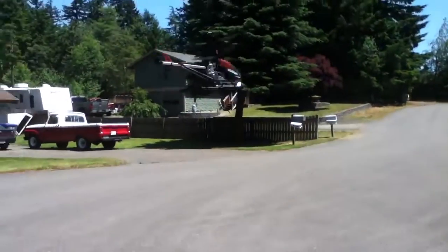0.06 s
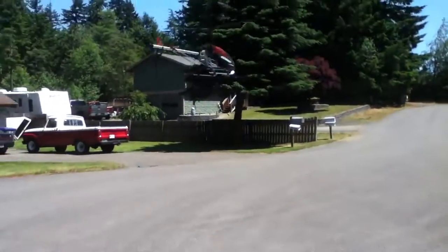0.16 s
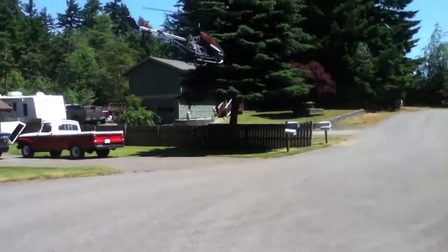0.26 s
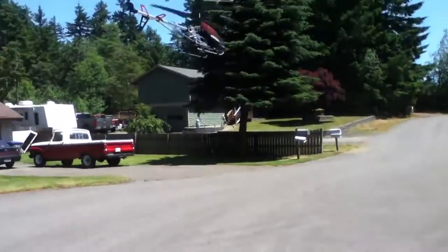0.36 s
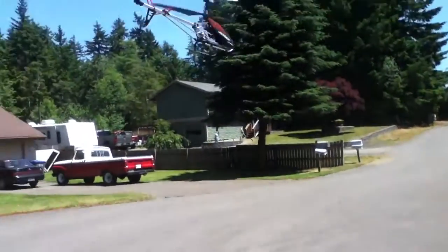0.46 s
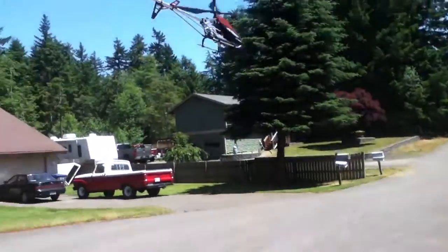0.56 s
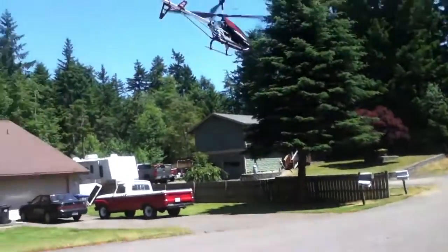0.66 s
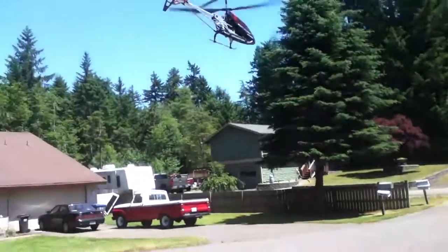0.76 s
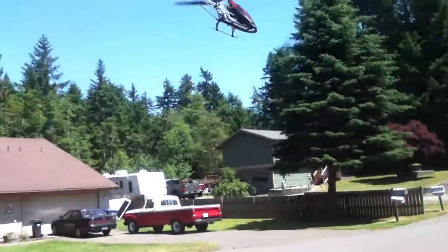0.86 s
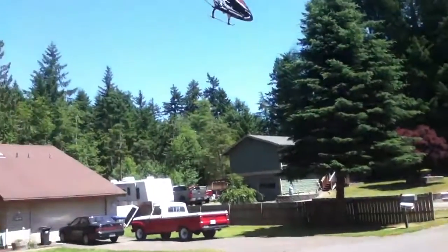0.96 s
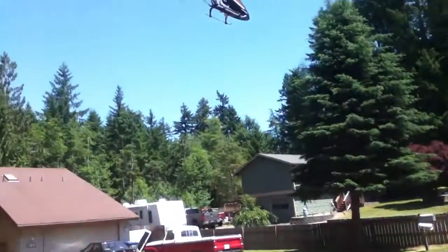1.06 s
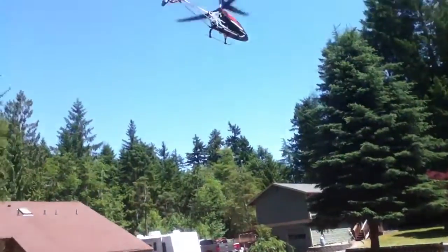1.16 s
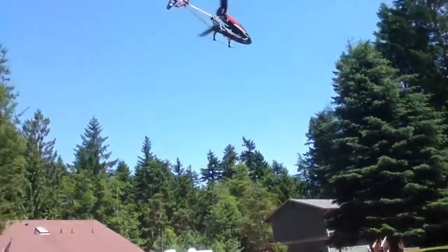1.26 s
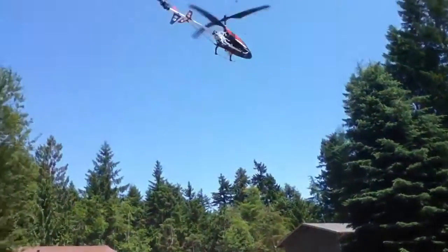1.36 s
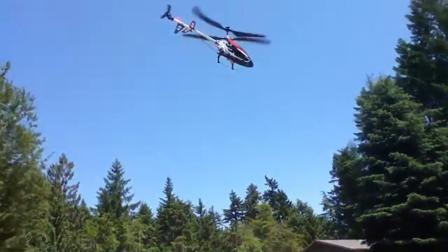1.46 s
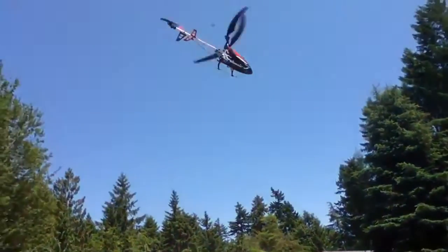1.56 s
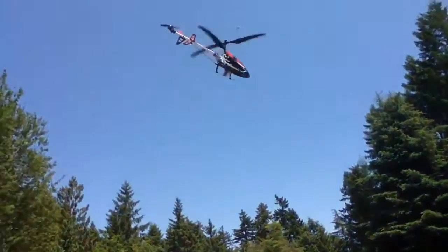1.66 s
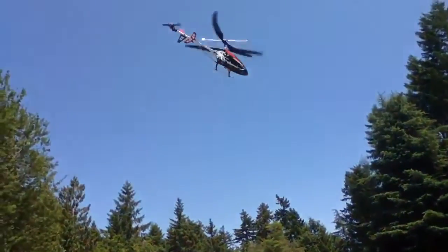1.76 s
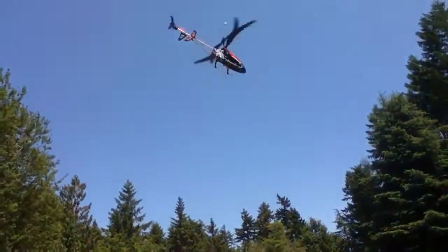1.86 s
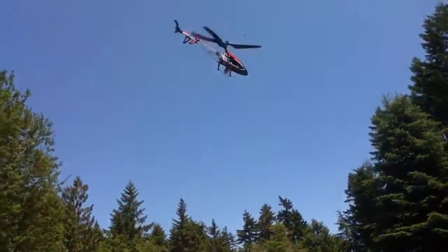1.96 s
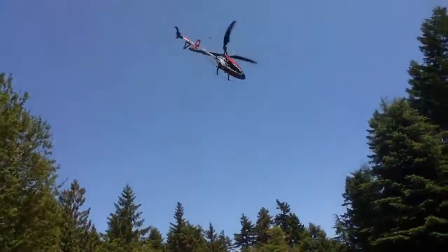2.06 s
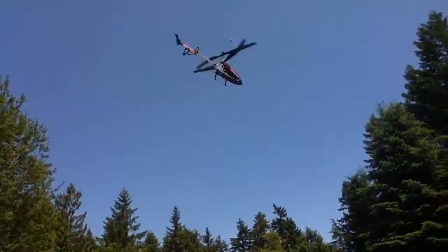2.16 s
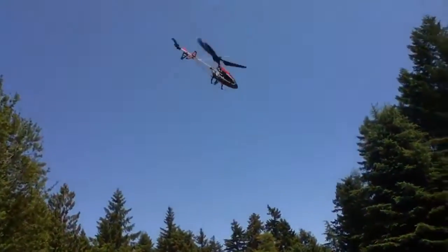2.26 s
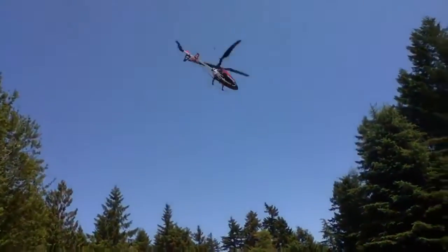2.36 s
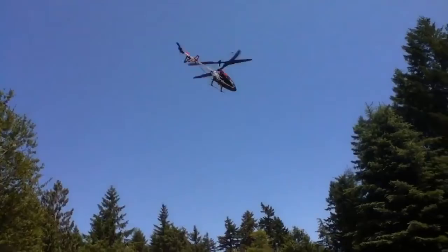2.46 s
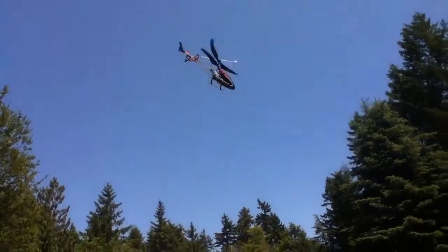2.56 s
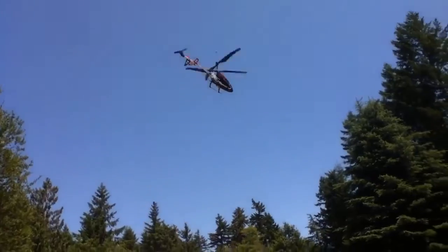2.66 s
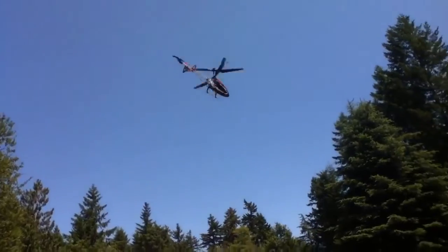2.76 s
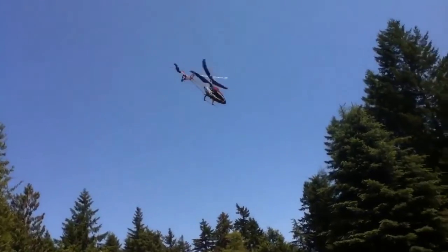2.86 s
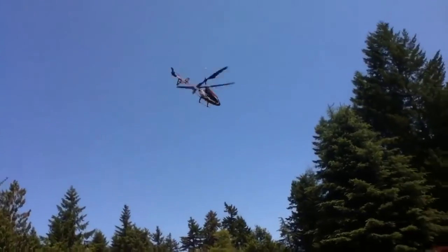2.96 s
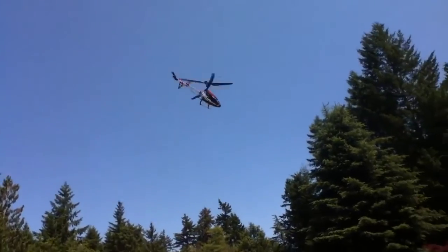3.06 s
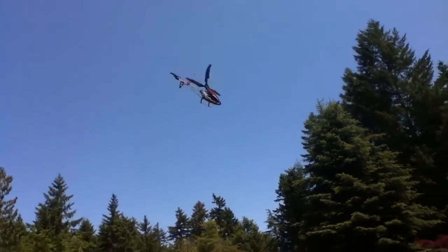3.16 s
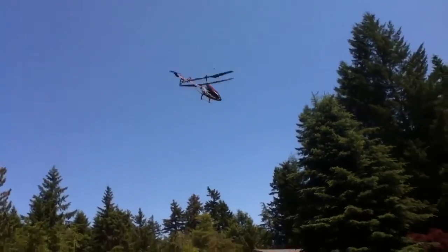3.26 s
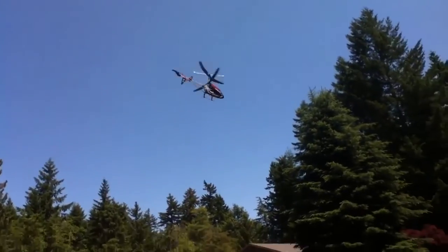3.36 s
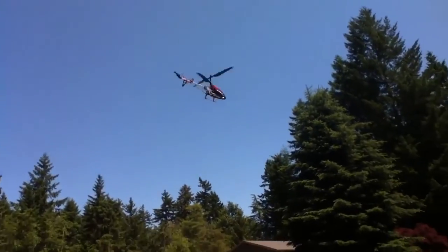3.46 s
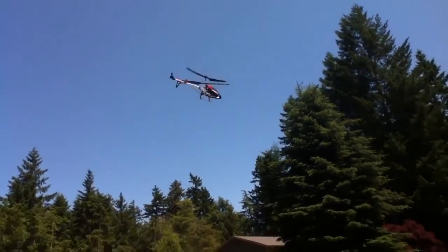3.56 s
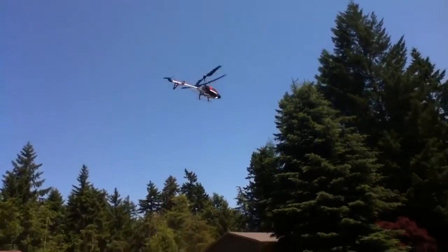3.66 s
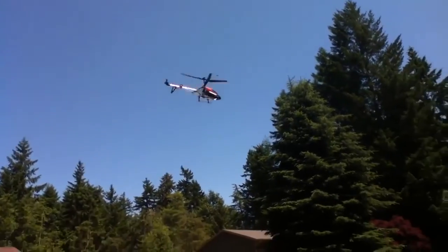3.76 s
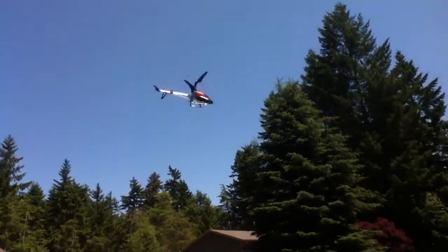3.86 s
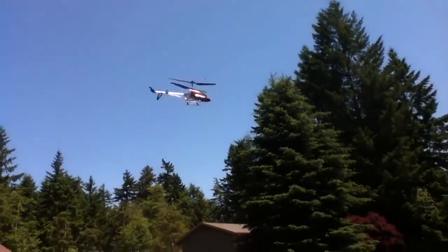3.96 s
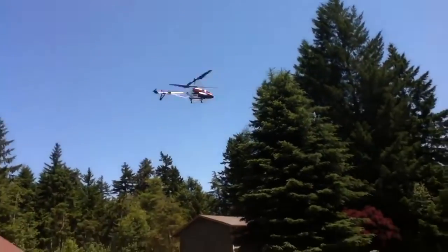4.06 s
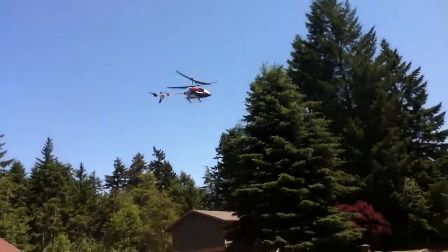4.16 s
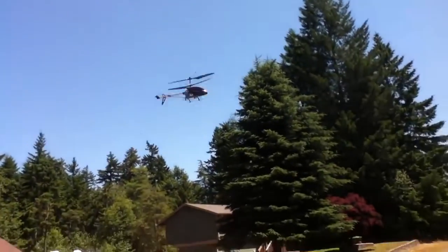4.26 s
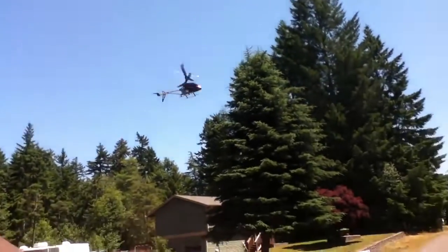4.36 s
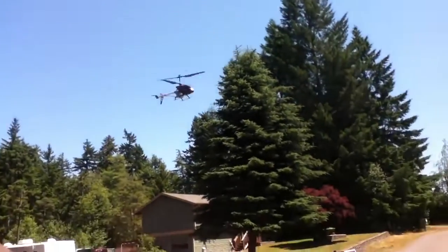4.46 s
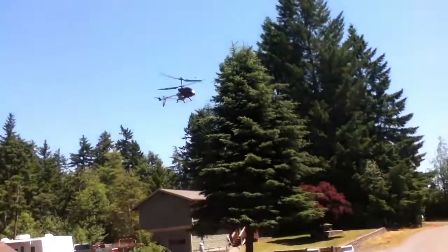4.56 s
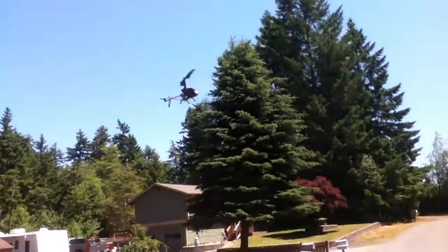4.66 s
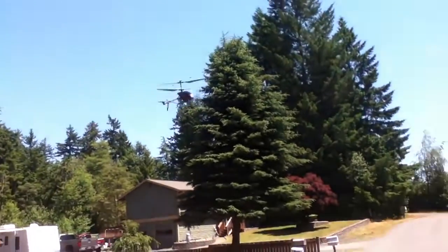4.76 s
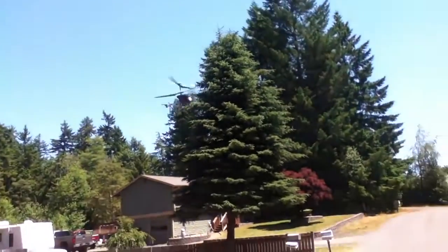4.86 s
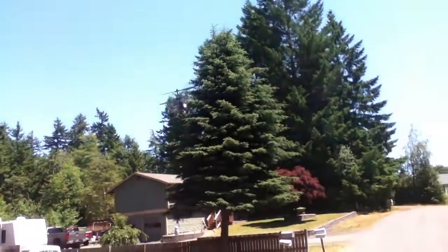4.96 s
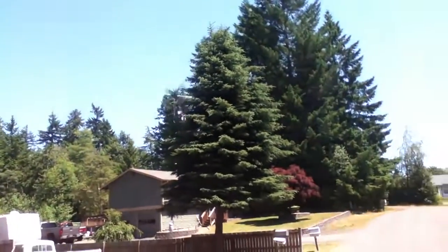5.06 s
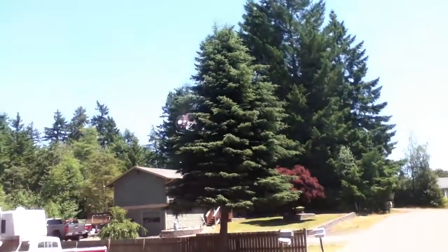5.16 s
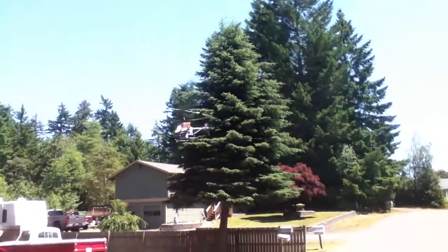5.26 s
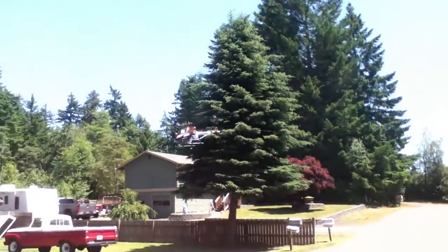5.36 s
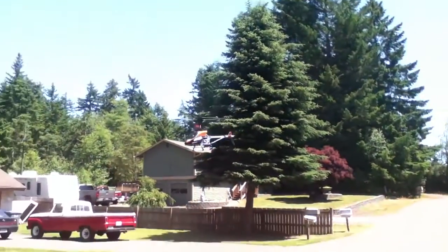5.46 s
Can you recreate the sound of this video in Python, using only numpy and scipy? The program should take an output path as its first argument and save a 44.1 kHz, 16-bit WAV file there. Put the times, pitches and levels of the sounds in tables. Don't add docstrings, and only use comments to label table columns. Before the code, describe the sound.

Thin, raspy geared motor whine with rapid rotor flutter and airy hiss, fading with distance, with light wind and a few taps on the microphone.

```python
import sys
import numpy as np
from scipy import signal
from scipy.fft import rfft, irfft, next_fast_len
from scipy.io import wavfile
from scipy.ndimage import uniform_filter1d

SR = 44100
rng = np.random.default_rng(int(sys.argv[2]) if len(sys.argv) > 2 else 0)


def transcribe(u):
    v = np.clip(np.atleast_2d(u).T, -1, 1)
    q = np.round(v * 32767).astype(np.int16)
    wavfile.write(sys.argv[1], SR, q)


def boost_factor(decibels):
    exponent = np.asarray(decibels, float) / 20
    return 10 ** exponent


N = 243873

# time_s, shaft_hz
UPPER_SPEED = [(0, 314.8), (.375, 308.4), (.5, 311.2), (.9, 314.5), (1.18, 312.5), (1.44, 292.3),
               (2.1, 292.7), (2.625, 285.6), (3.5, 294.4), (4.08, 310.7), (4.36, 315.6), (4.42, 310.4),
               (4.68, 292), (4.93, 291.2), (5.1, 309.4), (5.42, 311.3), (5.47, 284), (5.53, 286.3)]
GEAR_RATIO = 16
BANK_S, BANK_WIDTH_S = 4.11, 0.4


def evened(x):
    return x / np.sqrt(np.mean(x ** 2) + 1e-20)


def curves(rows):
    s, *columns = np.transpose(rows)
    return [np.interp(np.arange(N) / SR, s, c) for c in columns]


def spell(s, width):
    return np.exp(-((np.arange(N) / SR - s) / width) ** 4)


def drift(hz):
    size = next_fast_len(N // 16 + 2)
    f = np.fft.fftfreq(size, 16 / SR)
    phases = np.exp(2j * np.pi * rng.random(size))
    slow = np.fft.ifft(phases / (1 + (f / hz) ** 2))
    slow = slow / np.sqrt(np.mean(abs(slow) ** 2))
    return np.interp(np.arange(N) / 16, np.arange(size), slow)


def noise(points):
    size = next_fast_len(N)
    hz, db = np.transpose(points)
    log_hz = np.log(np.fft.rfftfreq(size, 1 / SR) + 1)
    shape_db = np.interp(log_hz, np.log(hz), db, left=-90, right=-90)
    spectrum = rfft(rng.standard_normal(size)) * boost_factor(shape_db)
    return evened(irfft(spectrum, size)[:N])


def tone(hz, rough, blur_hz):
    rough = np.clip(rough, 0, 1)
    body = np.sqrt(1 - rough) + np.sqrt(rough) * drift(blur_hz)
    return np.sqrt(2) * (body * np.exp(2j * np.pi * np.cumsum(hz) / SR)).real


def chop(turn, depth, lag=0.):
    swing = np.exp(depth * np.cos(turn - lag))
    return swing / np.sqrt(1 + depth ** 2 + depth ** 4 / 4)


def flight():
    # time_s, level_db
    distance = [(0, -1.5), (.45, -.5), (.85, 0.5), (1.4, -1.5), (2.66, -5.5), (3.4, -7), (3.97, -7),
                (4.28, -6.5), (4.56, -9), (5.17, -9), (5.53, -7)]
    # time_s, upper_wheel_db, belly_db
    upper_view = [(0, -2, -5), (.34, -0.5, -2), (.67, 2, 0.5), (.84, 3, -1), (1.0, -0.5, -1.5),
                  (1.2, 2.5, 0.5), (1.45, -1.5, -2), (1.85, -1.5, -1), (2.45, -2, 0), (2.8, 1, -6.5),
                  (3.15, -2, -2), (3.85, -1, 2.5), (4.02, 1.5, -3.5), (4.36, 1.5, -3.5), (4.53, -3.5, -6.5),
                  (4.8, 1, -7.5), (5.05, -5, -12), (5.53, -3, -18)]
    # time_s, lower_wheel_db
    lower_view = [(0, -1), (.17, -9), (.45, 2), (.85, -6), (1.2, -4.5), (1.36, 0), (1.85, 4), (2.7, 4),
                  (3.0, 1), (3.7, 2.5), (4.38, 3.5), (4.55, -4), (4.85, -3.5), (5.11, -13), (5.18, 7),
                  (5.42, 4), (5.48, 1), (5.53, -12)]
    cruise_hz = 300
    up, belly = curves(upper_view)
    climb = np.maximum(curves(UPPER_SPEED)[0] - cruise_hz, -12)
    return curves(distance)[0], up, curves(lower_view)[0], belly, climb


def gears(upper, lower, turn):
    # time_s, upper_percent, lower_percent
    tilt = [(0, .6, .6), (.5, .9, 1.2), (1.0, .5, 1.3), (1.4, .8, 1.4), (1.7, .6, 2.4), (2.3, .6, 1.9),
            (2.5, .5, .3), (2.9, .5, .3), (3.1, .7, 1.5), (3.5, .8, 1.2), (3.7, .8, .4), (4.08, .7, 3.8),
            (4.38, .6, 2.8), (4.43, 1.4, .6), (5.0, 1.5, .6), (5.15, .7, .7), (5.4, .6, .9), (5.47, 2.2, 3)]
    sweep_up, sweep_low = np.divide(curves(tilt), 100)
    high = upper * (1 - sweep_up * np.sin(turn - 1.9) + .002 * drift(30).real)
    low = lower * (1 - sweep_low * np.sin(turn) + .002 * drift(30).real)
    swing_up, swing_low = 32 * sweep_up, 700 * sweep_low ** 2
    far, up, down, belly, climb = flight()

    flare_s, flare_rise_s, flare_db = 5.47, 0.024, 14
    flare = np.clip((np.arange(N) / SR - flare_s) / flare_rise_s, 0, 1)
    broadside_s, broadside_width_s = 4.3, 0.61
    side = spell(broadside_s, broadside_width_s)

    high9 = boost_factor(-35 + 1.56 * far + 0.17 * up + 0.11 * climb + flare_db * flare)
    high18 = boost_factor(-22.5 + 1.11 * far + up + 0.019 * climb - 3.44 * flare)
    high27 = boost_factor(-34.5 + 0.91 * far + 0.45 * up + 0.2 * climb)
    both36 = boost_factor(-25.5 + 1.31 * far + belly)
    low9 = boost_factor(-34 + 0.96 * far + down)
    low18 = boost_factor(-28.5 + 0.79 * far + .1 * down + 0.4 * belly - 0.095 * climb + 6 * flare + 1.2 * side)
    low27 = boost_factor(-40 + 1.41 * far - .1 * down + 0.13 * climb + 7.4 * side)

    out = high9 * tone(9 * high, .8, 90) * chop(turn, swing_up, 1.9)
    out += high18 * tone(18 * high, .45 + .25 * side, 180) * chop(turn, swing_up, 1.9)
    out += high27 * tone(27 * high, 1.0, 180) * chop(turn, 0.28, 2.8)
    out += boost_factor(0.5) * both36 * tone(36 * high, 1, 420) * chop(turn, .3, 2.1)
    out += boost_factor(-6.0) * high27 * tone(45 * high, 0.82, 280)
    out += low9 * tone(9 * low, .1, 40) * chop(turn, swing_low, .3)
    out += low18 * tone(18 * low, .7 + .2 * side, 140) * chop(turn, .4 * swing_low, .3)
    out += low27 * tone(27 * low, 0.58, 150) * chop(turn, 0.36)
    out += boost_factor(-4.) * both36 * tone(36 * low, 1, 300) * chop(turn, .3)

    frame_ring_hz, frame_ring_db = 7560, -31.5
    ring = tone(np.full(N, frame_ring_hz), 0.88, 110)
    out += side * boost_factor(frame_ring_db + far) * ring * chop(turn, 0.59)

    worn = boost_factor(-38.5 + 2.23 * far + 0.29 * belly - 0.58 * climb)
    out += worn * tone(10 * high, 0.29, 37) * chop(turn, 0.084)
    out += boost_factor(6.) * worn * tone(19 * high, .9, 120)
    out += boost_factor(11.5) * worn * tone(37 * high, 0.68, 270) * chop(turn, 0.69, 3.4)
    return out


def motors(upper, lower, turn):
    far, up, down, belly, climb = flight()
    hidden = spell(BANK_S, BANK_WIDTH_S)
    shaft = boost_factor(-50.5 + 0.43 * far + 1.6 * up + 0.16 * belly + 0.041 * climb)
    brushes = boost_factor(-37 + 1.35 * far + 0.083 * down + 0.26 * belly - 0.035 * climb - 4.9 * hidden)
    up6 = boost_factor(-44.5 + 0.54 * far - 0.49 * down + 0.015 * climb)
    low6 = boost_factor(-40.5 + 0.78 * far + .05 * down + 0.44 * belly - .1 * climb - 4.6 * hidden)
    low12 = boost_factor(-47.5 + 0.71 * far + 0.098 * down + 0.1 * belly - 0.79 * climb)

    out = shaft * tone(upper, .12, 9) * chop(turn, .15)
    reach_hz = np.clip(2.1 * (upper - lower), 3, 38)
    merged_hz = 1.8 * upper + 1.2 * lower - reach_hz * np.sin(turn - 1.9)
    merged_depth = np.clip(.38 - .018 * climb, .15, .6)
    out += brushes * tone(merged_hz, .15, 45) * chop(turn, merged_depth, 5)
    out += up6 * tone(6 * upper - upper / GEAR_RATIO, .65, 55) * chop(turn, .5, 2.5)
    out += low6 * tone(6 * lower, .85, 45) * chop(turn, .5, 3.5)
    out += low12 * tone(12 * lower, .9, 90) * chop(turn, .2)
    out += boost_factor(-3.0) * low12 * tone(14 * lower, 0.74, 60)
    return out


def blades(shaft_hz, turn):
    # order, level_db
    beat_orders = [(2, -21), (3, -4), (4, 3.5), (5, -26), (6, 6.5), (7, 1), (9, -36), (10, 2), (11, -37),
                   (12, -1.5), (13, -5), (14, 1.5)]
    # pitch_hz, level_db
    downwash_spectrum = [(40, -30), (90, 7), (160, 5), (350, 5.5), (700, 4.5), (1000, 4.5), (1600, -2)]
    frame_spectrum = [(600, -16), (900, 1.5), (1200, 5.5), (1600, 8.5), (2100, 5.5), (2600, -7), (3600, -5)]
    hiss_spectrum = [(1800, -35), (2400, -1.5), (3500, -0.5), (4800, 3), (5900, 1.5), (6300, 1), (7200, 4),
                     (8500, -0.5), (9400, -8), (11000, -35), (13000, -38)]
    fizz_spectrum = [(8500, -1.5), (10000, 1.5), (11600, 0), (12800, -2.5), (14200, -3.5), (14900, -6),
                     (15700, -5), (17000, -30)]
    passing_hz = 2 * shaft_hz / GEAR_RATIO
    beat = sum(boost_factor(db) * tone(k * passing_hz, .15, 3) for k, db in beat_orders)

    far, up, down, belly, climb = flight()
    hidden = spell(BANK_S, BANK_WIDTH_S)
    gusts_db = 0.51 * drift(9.4).real
    beat_level = boost_factor(-60 + 1.18 * far - .5 * belly - 0.28 * up - 0.06 * climb)
    wash = boost_factor(-49.5 + 0.64 * far - 0.31 * belly - 1.3 * hidden)
    frame = boost_factor(-39 + 0.99 * far + .04 * belly - 0.016 * climb - 1.6 * hidden)
    hiss = boost_factor(-33.0 + far + gusts_db)
    fizz = boost_factor(-30.0 + 1.41 * far + 0.082 * belly + gusts_db)

    throb = chop(turn, .1) * chop(2 * turn, .1) * boost_factor(1. * drift(25).real)
    flicker = boost_factor(4.5 + 1.4 * drift(27).real)
    treble = boost_factor(8.5) * hiss * noise(hiss_spectrum) + flicker * fizz * noise(fizz_spectrum)
    air = boost_factor(3.5) * wash * noise(downwash_spectrum) + boost_factor(2.5) * frame * noise(frame_spectrum)
    return beat_level * beat + air + throb * treble


def handling():
    # pitch_hz, level_db
    gust_spectrum = [(15, -25), (30, -9), (50, 12), (100, 7), (150, 0.5), (260, -28), (500, -56)]
    # time_s, width_s, level_db over the breeze
    puffs = [(.05, 0.08, 25), (.36, .1, 13), (2.68, 0.064, 3), (2.93, 0.058, 7), (3.58, 0.075, 8),
             (3.8, .1, 10), (3.999, 0.098, 14), (4.3, 0.14, 11), (4.55, .1, 13), (5.02, .1, 7)]
    # start_s, peak_db, pitch_hz, t60_s
    bumps = [
        (3.735, -34, 110, 0.054),
        (3.81, -33.5, 90, 0.091),
        (4.286, -28, 85, .035),
        (4.402, -31, 81.6, 0.047),
        (4.601, -32, 200, 0.015),
        (4.611, -15.5, 698, 0.0022),
        (4.625, -25, 860, 0.018),
        (4.63, -30, 600, 0.013),
    ]
    breeze_db = -65
    puffs_db = sum(db * spell(s, width) for s, width, db in puffs)
    out = boost_factor(breeze_db + puffs_db + 1.6 * drift(7.8).real) * noise(gust_spectrum)
    t = np.arange(3000) / SR
    for s, db, hz, t60 in bumps:
        out[round(s * SR):][:len(t)] += boost_factor(db - 60 * t / t60) * np.sin(2 * np.pi * hz * t)
    return out


def thin_treble(x):
    # pitch_hz, level_db
    mask = [(2000, -30), (5500, -13), (6300, -9), (7500, -6.5), (9200, -5), (11000, -8), (12300, -4),
            (13000, -1), (14000, -2), (15600, 0)]
    # start_s, end_s, highest_hz
    dull_spells = [(0, 1.3, 14650), (4.0, 4.55, 14550), (4.85, 5.35, 15000)]
    full_hz = 15650
    hz, t, z = signal.stft(x, SR, nperseg=2048, noverlap=1024)
    power = abs(z) ** 2
    near = uniform_filter1d(uniform_filter1d(power, size=5, axis=0), size=2, axis=1)
    around = uniform_filter1d(power, size=90, axis=0)
    keep = near > around * boost_factor(2 * np.interp(hz, *np.transpose(mask)))[:, None]
    spare = rng.random(len(t)) < .2
    tops = [np.where((t >= a) & (t < b), kept_hz, full_hz) for a, b, kept_hz in dull_spells]
    top_hz = np.where(spare, SR / 2, np.min(tops, axis=0))
    keep &= hz[:, None] < top_hz
    return signal.istft(z * keep, SR, nperseg=2048, noverlap=1024)[1][:N]


def scene():
    # time_s, shaft_hz
    lower_speed = [(0, 307.4), (.5, 304.4), (.78, 296.9), (1.17, 301.1), (1.53, 286.4), (1.85, 285.3),
                   (2.3, 284.6), (2.8, 288.5), (3.7, 277.5), (3.95, 277), (4.16, 264.9), (4.36, 264.8),
                   (4.62, 278.6), (4.92, 280.8), (5.13, 265.3), (5.42, 270.8), (5.47, 257.7), (5.53, 265)]
    turn_start = 0.344
    upper, lower = curves(UPPER_SPEED)[0], curves(lower_speed)[0]
    turn = 2 * np.pi * (np.cumsum(upper) / SR / GEAR_RATIO + turn_start)
    mono = gears(upper, lower, turn)
    mono += motors(upper, lower, turn)
    mono += blades(.6 * upper + .4 * lower, turn)
    mono += handling()
    return np.array([mono, mono])


def low_pass(x):
    return signal.sosfilt(signal.butter(12, 15700, fs=SR, output="sos"), x)


def record(dry):
    mono = thin_treble(dry[0])
    return low_pass(np.array([mono, mono]))


dry = scene()
out = record(dry)
transcribe(out)
```